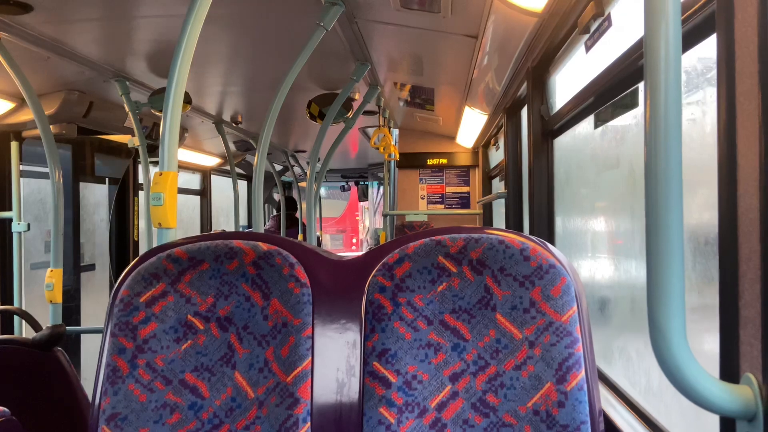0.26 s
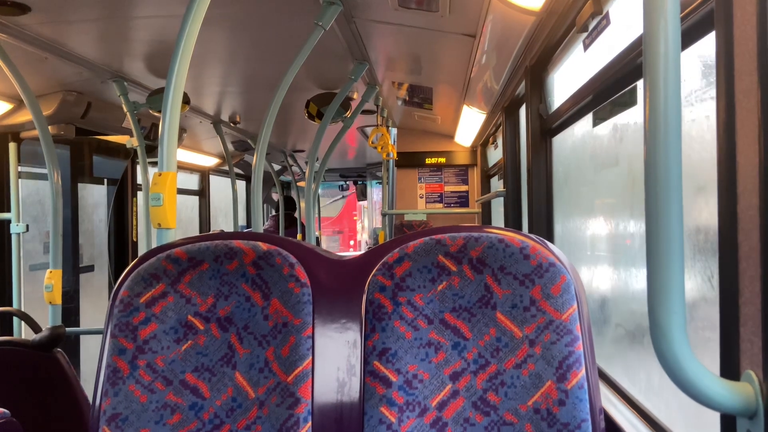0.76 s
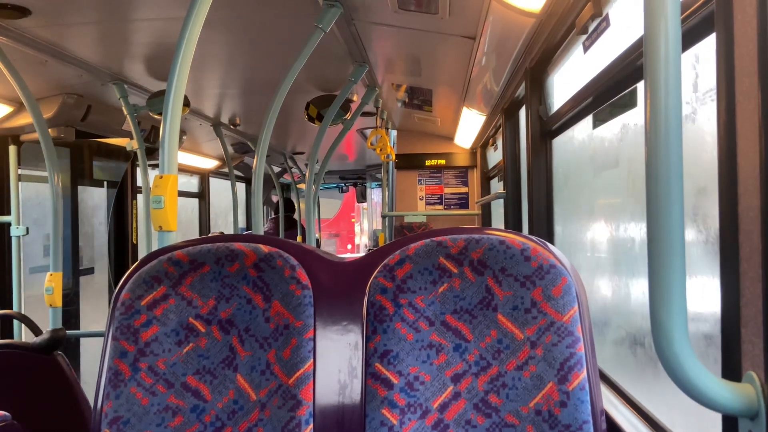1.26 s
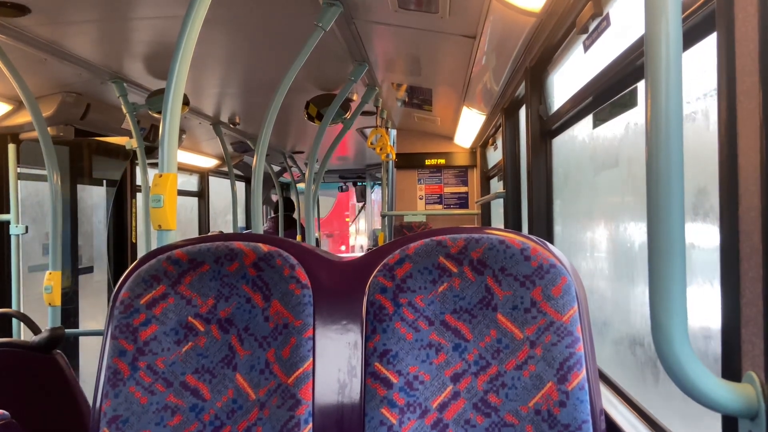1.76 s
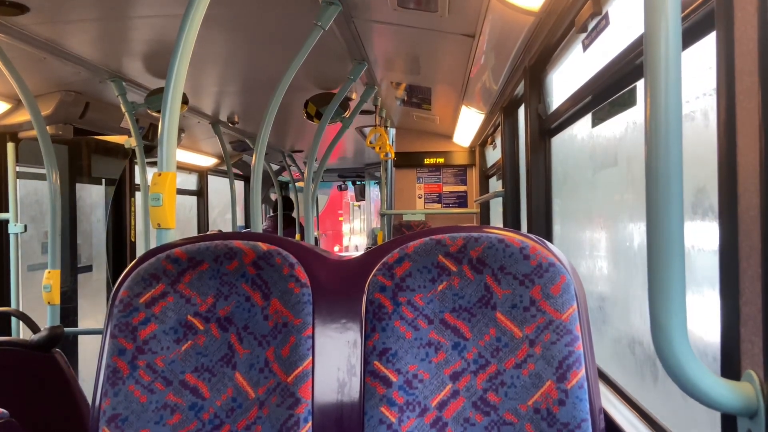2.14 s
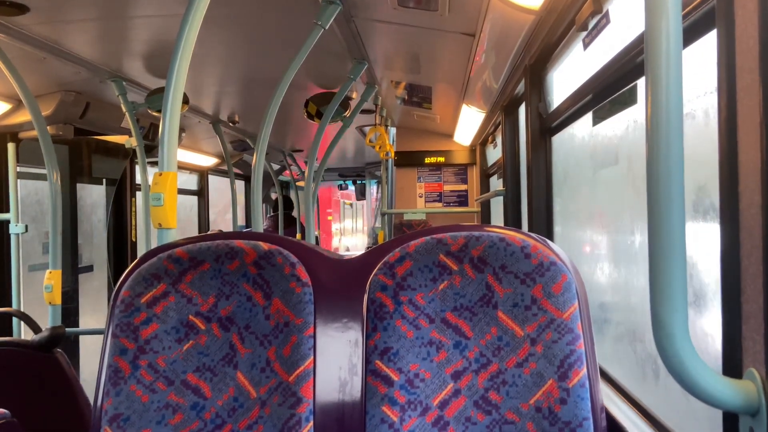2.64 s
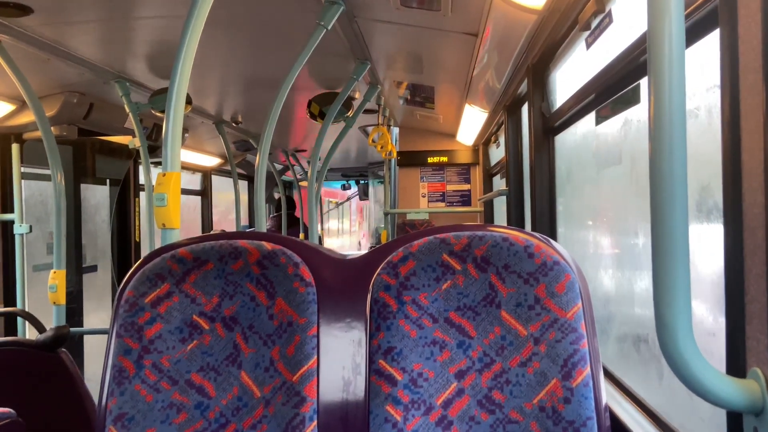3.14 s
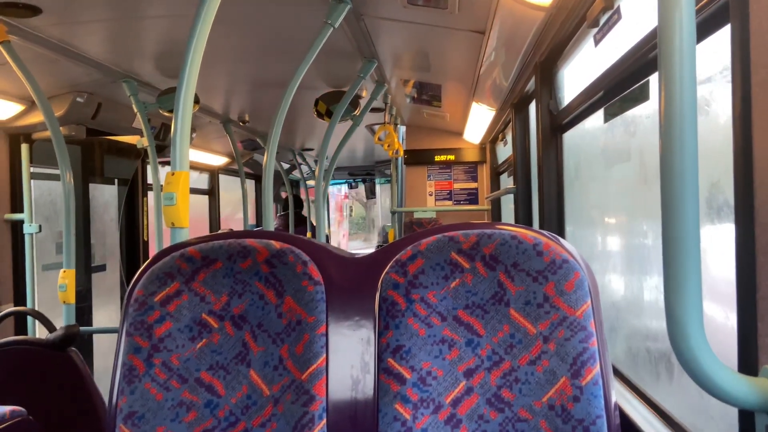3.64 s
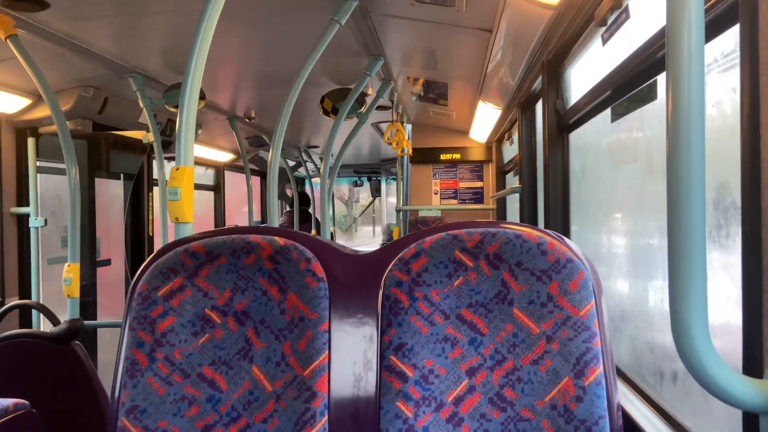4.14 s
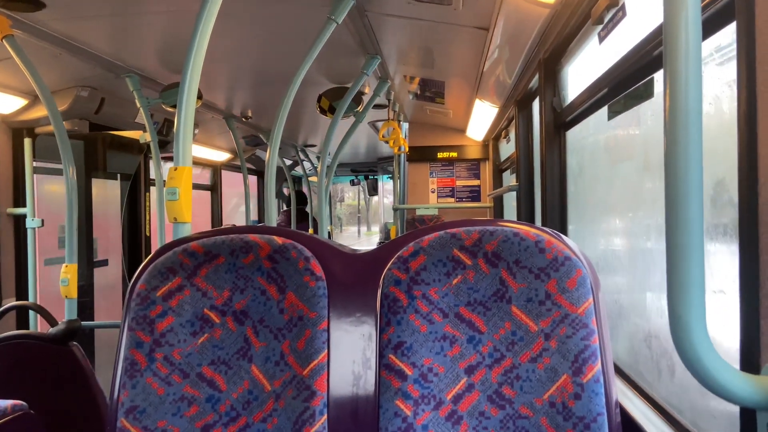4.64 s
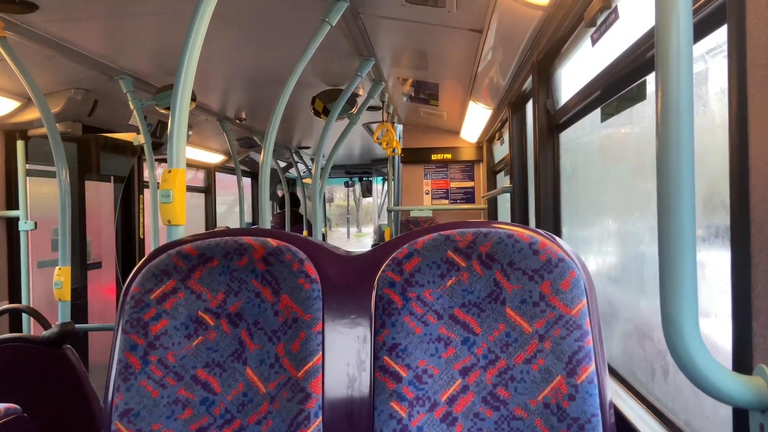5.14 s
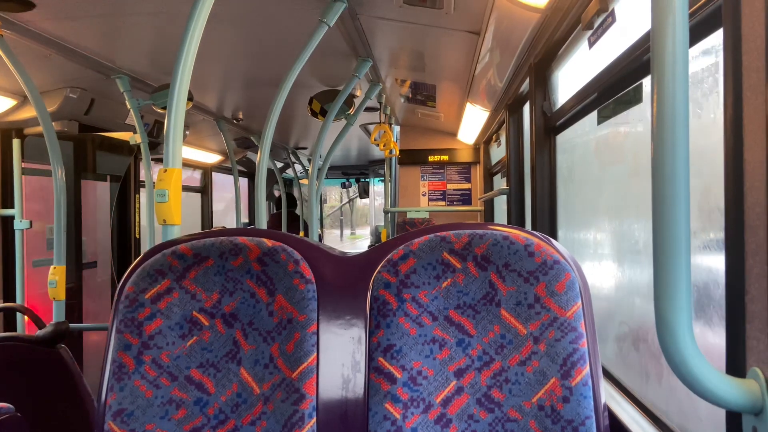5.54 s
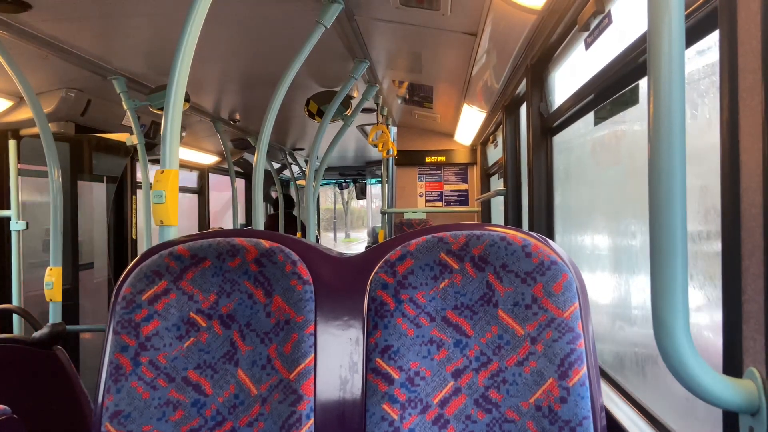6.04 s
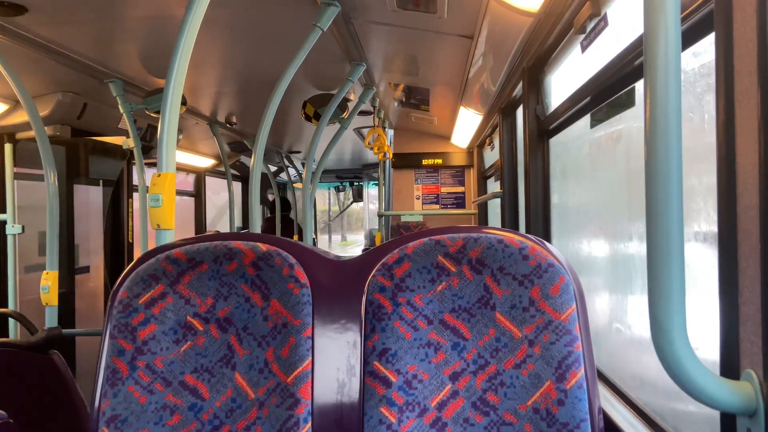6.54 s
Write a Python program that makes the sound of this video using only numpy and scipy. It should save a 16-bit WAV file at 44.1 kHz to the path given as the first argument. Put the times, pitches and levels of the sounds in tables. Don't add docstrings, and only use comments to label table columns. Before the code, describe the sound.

Heard from a seat on a bus's lower deck: a heavy diesel idles with a slow, uneven throb, air vents hissing and a loose ceiling panel buzzing. Near three seconds the revs climb, with low cabin boom and faint gear whine. Another bus's steady low engine hum passes underneath. Just before six seconds the throttle eases with a tiny falling turbo chirp, then the engine pulls harder and roars until an abrupt stop.

```python
import sys
import numpy as np
from scipy import signal
from scipy.fft import rfft, irfft, next_fast_len
from scipy.io import wavfile
from scipy.ndimage import uniform_filter1d

SR = 44100
rng = np.random.default_rng(int(sys.argv[2]) if len(sys.argv) > 2 else 0)


def linear_from_db(decibels):
    return 10 ** (np.asarray(decibels, float) / 20)


def dump(signal):
    limited = np.clip(np.atleast_2d(signal).T, -1, 1)
    pcm = np.round(limited * 32767).astype(np.int16)
    wavfile.write(sys.argv[1], SR, pcm)


N = 299439
T = np.arange(N) / SR
PAD = next_fast_len(N + SR // 4)
HZ = np.fft.rfftfreq(PAD, 1 / SR)

# [pitch_hz, level_db]
VENT_SPECTRUM = [(3000, -30), (5000, -6.5), (5800, -8), (7500, -5), (8400, -3), (10000, -4), (10900, -3.5),
                 (12300, -4.5), (13500, -7.5), (15000, -12), (15700, -10.5)]
# [pitch_hz, width_hz, lift_db]
GRILLE_MODES = [(7030, 50, 3), (7572, 36, 5.5), (7800, 50, 2), (9966, 45, 3), (10435, 30, 3),
                (10630, 35, 4), (10905, 50, 4), (11887, 60, 2)]
# [centre_s, lift_db, length_s]
PANEL_JOLTS = [(0.065, 5.5, 0.036), (0.796, 11, 0.17), (1.795, 10.5, 0.081), (2.6, 4.5, 0.67),
               (3.258, 3.5, 0.075), (3.766, 6.5, 0.14), (4.046, 3, 0.13), (4.782, 10, 0.079),
               (5.395, 12, 0.2), (5.93, 8.5, 0.17), (6.413, 12.5, 0.11)]
# [pitch_hz, level_db]
PANEL_SPECTRUM = [(200, -80), (315, -23), (335, -5.5), (350, 1), (375, -36.5), (600, -86)]
# [pitch_hz, level_db]
RUMBLE_SPECTRUM = [(22, -38), (32, -19), (50, -1), (80, -17), (140, -6.5), (195, -10.5), (250, -6),
                   (300, -15.5), (345, -19.5), (400, -17), (600, -54), (1200, -110)]
# [pitch_hz, level_db]
DRONE_SPECTRUM = [(240, -64), (400, -2), (451, -3.5), (499, -3), (714, -2.5), (787, -8), (950, -8.5),
                  (1240, -27), (2090, -120)]
# [pitch_hz, level_db]
ROAR_SPECTRUM = [(530, -35), (900, -4), (1460, -4.5), (1630, -7), (2100, -9), (2730, -25), (4620, -120)]
# [pitch_hz, level_db]
CLATTER_SPECTRUM = [(1200, -28), (2000, -9.5), (2400, -1.5), (3000, -4.5), (3660, -7), (5000, -13.5),
                    (6500, -16.5), (8000, -19), (11000, -21), (15000, -70)]
# [pitch_hz, width_hz, lift_db]
TRIM_MODES = [(455.5, 50, 5), (576, 160, 4), (797.5, 30, 10), (1249, 24, 5.5), (1626, 19, 7), (2430, 56, 2)]
# [time_s, firing_db, octave_db]
NEIGHBOUR_LEVELS = [
    (2.8, -70, -68),
    (3.2, -40, -33),
    (3.6, -34, -23.5),
    (3.9, -30, -27),
    (4.1, -35, -41),
    (4.6, -29, -59),
    (5.3, -26, -50),
    (5.6, -54, -60),
]
# [time_s, pitch_hz, level_db]
TURBO_CHIRP = [
    (5.83, 7797, -85),
    (5.86, 7800, -52.5),
    (5.95, 7620, -60),
    (6.01, 7500, -60),
    (6.1, 7286, -66),
    (6.2, 7350, -85),
]
# [time_s, crank_hz]
CRANK_SPEED = [(0.0, 13.6), (0.5, 12.75), (0.9, 12.3), (1.2, 12.05), (2.74, 12.12), (3.05, 14.6),
               (3.27, 16.1), (3.7, 17.75), (3.88, 17.7), (4.05, 20.7), (4.3, 23.1), (4.7, 24.7),
               (5.12, 26.9), (5.4, 27.9), (5.76, 28.35), (6.01, 26.8), (6.35, 29.6), (6.79, 32.7)]
# [time_s, load_db, fuelling_db, combustion_noise_db]
ENGINE_CONTROLS = [(0.0, 0.5, -0.5, 1), (0.6, 1.5, 2, 0.5), (1.15, 1.5, 0, -0.5), (2.0, 2.5, 1.5, -0.5),
                   (2.7, 1.5, 3, 0.5), (2.95, 2.5, 0, -2.5), (3.2, -0.5, 3, -3), (3.78, 2, 0.5, -1),
                   (3.92, 6.5, 5, -1), (4.2, 6, 1, 0), (4.45, 5.5, 2.5, 2), (4.75, 10.5, 2.5, 1),
                   (5.05, 10, 6.5, 2), (5.3, 8.5, -1, 1), (5.8, 9, 4.5, 3), (6.05, 10.5, 1, 3),
                   (6.35, 13, 3, 3.5), (6.79, 10.5, 4, 7)]
# [pitch_hz, width_hz, lift_db]
CASING_MODES = [(520, 44, 21.5), (592, 44, 21.5), (650, 13, 12), (775, 36, 13), (950, 100, 14.5),
                (1070, 28, 14), (1146, 20, 13)]
# [crank_multiple, level_db]
UNEVEN_LEVELS = [(2.0, -3.5), (2.5, 3.5), (3.5, 5), (4.5, 6), (5.0, 4), (5.5, -3), (6.5, -4), (7.0, 6.5),
                 (7.5, -0.5), (9.0, 6), (10.5, 0.5), (11.0, 7.5), (13.0, -2), (15.0, 4.5), (27.0, -1),
                 (29.0, 4)]
# [pitch_hz, gain_db]
CABIN_PATH = [(24.0, -43), (40.0, -41), (55.0, -46), (65.0, -28.5), (80.0, -41), (95.0, -28),
              (110.0, -36.5), (125.0, -40.5), (165.0, -41.5), (200.0, -39), (300.0, -51.5), (340.0, -42.5),
              (400.0, -61.5), (900.0, -88)]
# [crank_multiple, level_db]
EVEN_LEVELS = [(4, 5), (14, -1.5), (16, 0.5), (18, 1.6), (20, -2.5), (22, 2.5), (24, -4), (26, 6.5),
               (28, -4), (30, -4)]
# [pitch_hz, gain_db]
FLOOR_PATH = [(45.0, -59), (100.0, -37), (130.0, -31), (165.0, -42), (183.0, -26), (196.0, -18),
              (210.0, -33.5), (232.0, -44), (250.0, -41.5), (300.0, -50), (340.0, -41), (375.0, -52),
              (450.0, -46), (1000.0, -85)]
# [pitch_hz, width_hz, lift_db]
EXHAUST_MODES = [(93.5, 27, 7.5), (131.2, 7.9, 13), (157.5, 9.1, 12.5), (196.6, 30.3, 21), (224.5, 16.2, 6),
                 (248.8, 14.3, 14), (290, 42, -1), (300, 17, -8.5), (327.6, 14.7, 10.5), (368.5, 11.6, 11),
                 (388, 15, 0.5)]
# [pitch_hz, width_hz, lift_db]
DECK_MODES = [(37, 3.9, 0), (47.4, 24, -4), (69.55, 8.3, 14), (73.6, 3.2, -4.5), (85.6, 10.1, 11),
              (96.8, 11.3, 12.5), (112.3, 8.4, 3), (119.7, 15, 8.5), (143.6, 9.4, 9.5), (163.8, 7.5, 10.5),
              (166.4, 8.9, -16.5), (193.4, 14, 13.5)]
# [pitch_hz, lead_rad]
PORT_LEAD = [(20, -0.5), (70, -0.45), (195, -1), (345, -1.1), (690, -3.7), (1210, -3.4), (3620, 4.9),
             (5770, 9.9), (6460, 12.7), (6800, 12.7), (9050, 9.4), (10500, 6.5), (11400, 6.1), (12600, 3.4),
             (13700, 2.9), (14700, 0)]
# [pitch_hz, likeness_0_to_1]
PORT_LIKENESS = [(60, 1), (150, 1), (280, 0.18), (600, 0.39), (1500, 0.35), (4000, 0.08), (7000, 0.34),
                 (9500, 0.68), (10600, 0.7), (13000, 0.76), (15000, 0.97)]
# [pitch_hz, balance_db]
PORT_BALANCE = [(60, -2.5), (110, -2.5), (200, -3), (380, -0.8), (700, -0.6), (1290, -1.75), (2380, -2),
                (4400, -0.5), (8120, -2), (15000, 0)]


def curves(table):
    time_s, *columns = np.transpose(table)
    return [np.interp(T, time_s, column) for column in columns]


def across(points, hz):
    pitch_hz, value = np.transpose(points)
    return np.interp(np.log(hz + 1e-9), np.log(pitch_hz), value)


def rings(modes, hz):
    return sum(lift_db / (1 + (2 * (hz - centre_hz) / width_hz) ** 2)
               for centre_hz, width_hz, lift_db in modes)


def walk(rate_hz):
    hold = int(SR / rate_hz)
    held = np.repeat(rng.standard_normal(N // hold + 1), hold)
    slewed = uniform_filter1d(uniform_filter1d(held, hold), hold)
    return 1.28 * slewed[:N]


def noise(spectrum, modes, level_db, flicker_db, rate_hz):
    colour = linear_from_db(across(spectrum, HZ) + rings(modes, HZ))
    x = irfft(rfft(rng.standard_normal((2, PAD))) * colour, PAD)[:, :N]
    return x / x.std() * linear_from_db(level_db + flicker_db * walk(rate_hz))


def tone(turns, level_db, wobble_rad=0.0, locked=False):
    start = 0 if locked else rng.random()
    phase = 2 * np.pi * (turns + start) + wobble_rad * walk(14)
    return np.sqrt(2) * linear_from_db(level_db) * np.cos(phase)


def filtered(x, response):
    edge = (PAD - N) // 2
    mirrored = np.pad(x, [(0, 0)] * (x.ndim - 1) + [(edge, edge)], mode="reflect")
    return irfft(rfft(mirrored, PAD) * response, PAD)[..., edge:edge + N]


def vents():
    return noise(VENT_SPECTRUM, GRILLE_MODES, -48.5, flicker_db=0.5, rate_hz=15)


def ceiling_buzz(load_db):
    jolts_db = sum(lift_db * np.exp(-((T - centre_s) / length_s) ** 2)
                   for centre_s, lift_db, length_s in PANEL_JOLTS)
    return noise(PANEL_SPECTRUM, [], -43.5 + 0.44 * load_db + jolts_db, flicker_db=1.5, rate_hz=13)


def rumble(load_db):
    return noise(RUMBLE_SPECTRUM, [], -34 + 0.89 * load_db, flicker_db=3.75, rate_hz=3.7)


def combustion(turns, burn_db):
    pulse = np.cos(2 * np.pi * 3 * turns)
    street_left_s, street_fade_s = 2.8, 0.11
    street_db = 1.5 / (1 + np.exp((T - street_left_s) / street_fade_s))
    drone_db = -39.5 + 0.84 * burn_db + street_db
    drone = noise(DRONE_SPECTRUM, TRIM_MODES, drone_db, flicker_db=1.4, rate_hz=10)
    roar = noise(ROAR_SPECTRUM, TRIM_MODES, -42 + 1.13 * burn_db, flicker_db=0.86, rate_hz=8)
    clatter = noise(CLATTER_SPECTRUM, TRIM_MODES, -47 + 1.15 * burn_db, flicker_db=0.2, rate_hz=10)
    return drone * (1 + 0.13 * pulse) + roar * (1 + 0.089 * pulse) + clatter * (1 + 0.045 * pulse)


def neighbour():
    firing_db, octave_db = curves(NEIGHBOUR_LEVELS)
    return tone(36.6 * T, firing_db, wobble_rad=1.0) + tone(69.2 * T, octave_db, wobble_rad=1.0)


def turbo():
    pitch_hz, level_db = curves(TURBO_CHIRP)
    return tone(np.cumsum(pitch_hz) / SR, level_db + 4 * walk(45), wobble_rad=6)


def whines(turns, crank_hz, load_db):
    gain_hz_per_s = np.clip(np.gradient(crank_hz) * SR, -6, 4)
    pull_db = 1.37 * load_db + 0.69 * gain_hz_per_s

    def whine(multiple, level_db):
        casing_db = rings(CASING_MODES, multiple * crank_hz)
        return tone(multiple * turns, level_db + casing_db + pull_db + 3.4 * walk(14), wobble_rad=0.66)

    gear, belt = whine(24.45, -79), whine(36.45, -80)
    return gear + belt


def crank():
    crank_hz = uniform_filter1d(curves(CRANK_SPEED)[0], SR // 12, mode="nearest")
    return 0.3 + np.cumsum(crank_hz) / SR, crank_hz


def orders(turns, crank_hz, table, path, load_db, waver_db):
    total = 0
    for k, order_db in table:
        waver = waver_db * (1 + min(k / 30, 0.5)) * walk(7)
        level_db = order_db + path(k * crank_hz) + load_db + waver
        total = total + tone(k * turns, level_db, wobble_rad=0.00048 * k ** 2, locked=k < 4)
    return total


def uneven_orders(turns, crank_hz, load_db):
    return orders(turns, crank_hz, UNEVEN_LEVELS, lambda hz: across(CABIN_PATH, hz),
                  -4 + 0.5 * load_db, waver_db=3.5)


def even_orders(turns, crank_hz, load_db):
    def path(hz):
        return across(FLOOR_PATH, hz) + rings([(250, 16, 7.9)], hz)

    return orders(turns, crank_hz, EVEN_LEVELS, path, -3.5 + load_db, waver_db=1.18)


def exhaust_orders(turns, crank_hz, load_db, fuel_db):
    total = 0
    for k, order_db in ((8, -43.5), (10, -42.5), (12, -41)):
        pipe_db = rings(EXHAUST_MODES, k * crank_hz)
        level_db = order_db + pipe_db + 0.16 * load_db + 0.32 * fuel_db + 1.5 * walk(11)
        total = total + tone(k * turns, level_db, wobble_rad=0.27)
    return total


def firing(turns, crank_hz, fuel_db):
    def order(k, level_db):
        return tone(k * turns, level_db + rings(DECK_MODES, k * crank_hz) + fuel_db,
                    wobble_rad=0.021 * k, locked=True)

    beat_s, dip_s, depth, beat_ends_hz = 0.786, 0.5, 0.83, 14.1
    idling = np.clip(beat_ends_hz - crank_hz, 0, 1)
    idle_beat = abs(1 - depth * idling * np.exp(2j * np.pi * (T - dip_s) / beat_s))
    fan_turns = 74.07 * T + 0.48 + 6 * 0.3
    fan_db = -30.5 - 41 * np.maximum(T - 3.5, 0)
    return idle_beat * order(3, -28) + order(6, -32) + tone(fan_turns, fan_db, locked=True)


def scene():
    turns, crank_hz = crank()
    load_db, fuel_db, burn_db = curves(ENGINE_CONTROLS)
    shared, own = vents() + ceiling_buzz(load_db) + rumble(load_db) + combustion(turns, burn_db)
    tones = (neighbour()
             + uneven_orders(turns, crank_hz, load_db)
             + even_orders(turns, crank_hz, load_db)
             + exhaust_orders(turns, crank_hz, load_db, fuel_db)
             + firing(turns, crank_hz, fuel_db))
    alike = np.clip(across(PORT_LIKENESS, HZ), 0, 1)
    tilt = linear_from_db(across(PORT_BALANCE, HZ))
    shift = tilt * np.exp(1j * np.interp(HZ, *np.transpose(PORT_LEAD)))
    left = filtered(tones, shift) + filtered(shared, alike * shift)
    left = left + filtered(own, tilt * np.sqrt(1 - alike ** 2))
    return np.array([left, tones + shared]) + whines(turns, crank_hz, load_db) + turbo()


def top_cut(x):
    return signal.sosfilt(signal.butter(12, 16420, fs=SR, output="sos"), x)


def record(dry):
    top_hz, stop_fade_s = 15740, 0.012
    rounded = 1.406 * np.tanh(dry / 1.41)
    fade = np.sin(np.pi / 2 * np.clip((T[-1] - T) / stop_fade_s, 0, 1))
    mix = filtered(rounded * fade, HZ < top_hz)
    return top_cut(mix)


dry = scene()
out = record(dry)
dump(out)
```